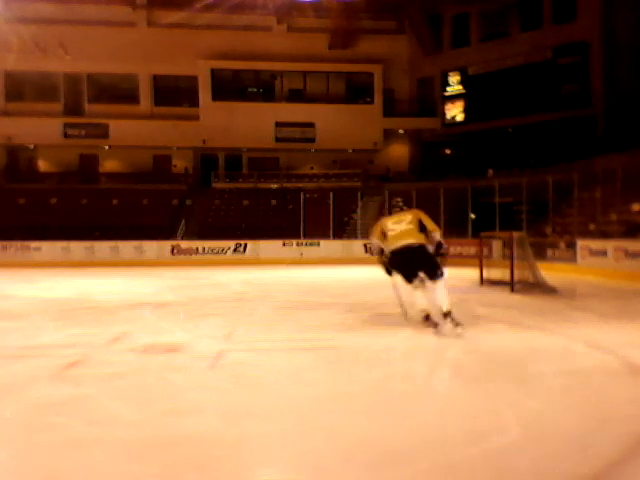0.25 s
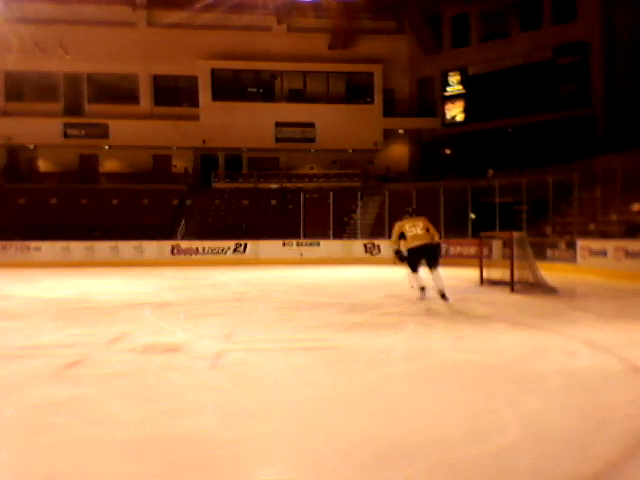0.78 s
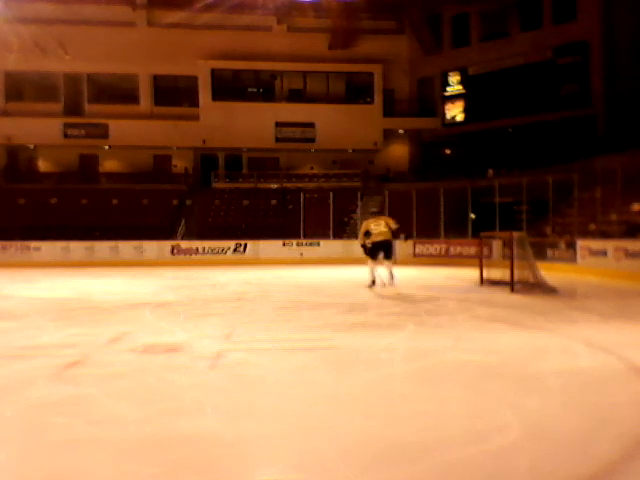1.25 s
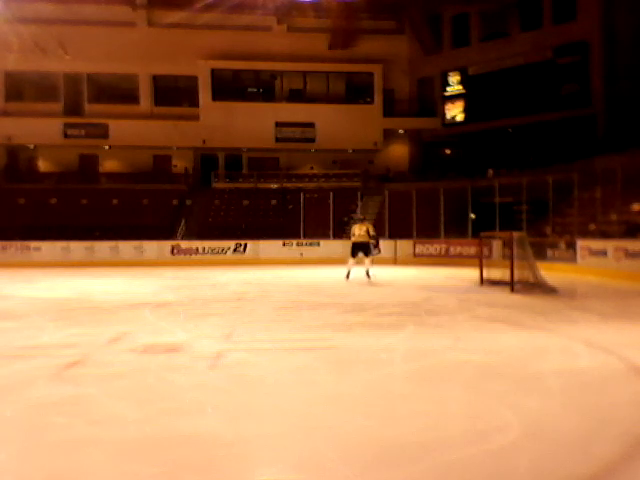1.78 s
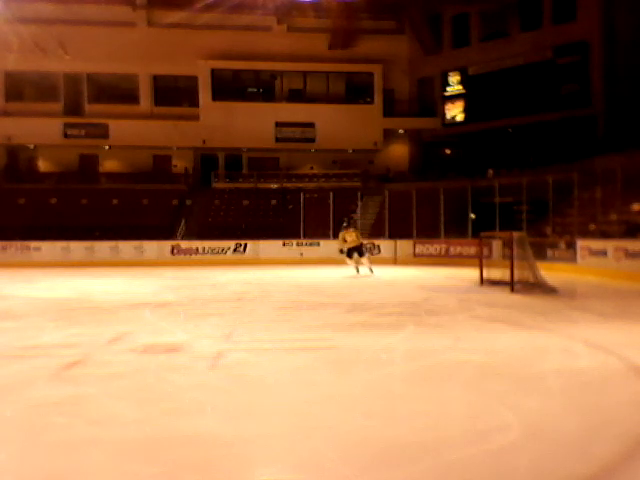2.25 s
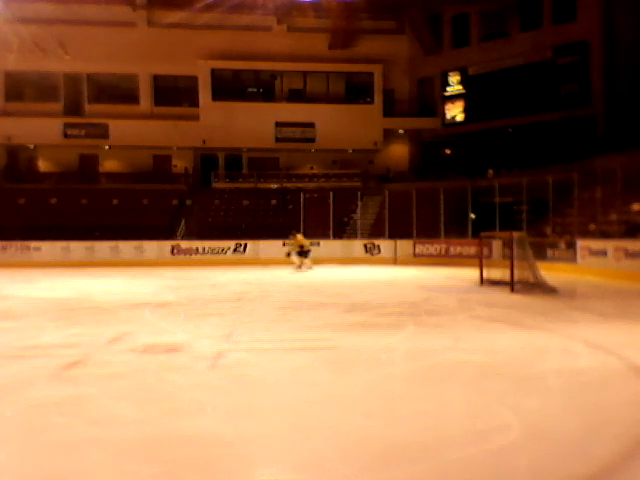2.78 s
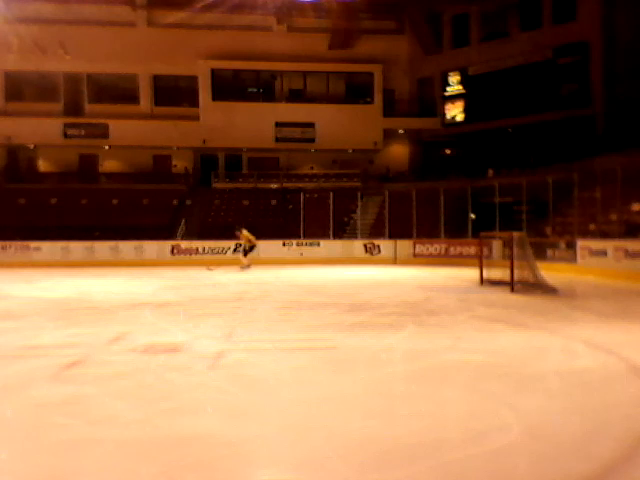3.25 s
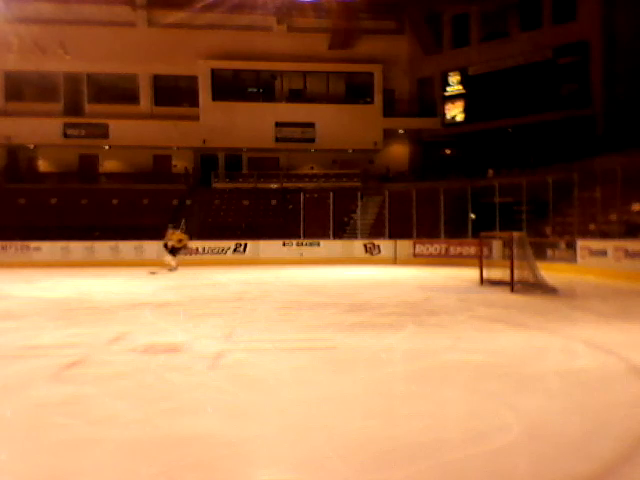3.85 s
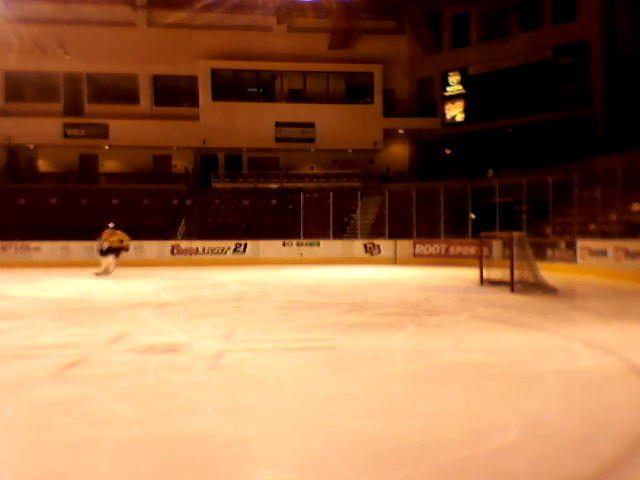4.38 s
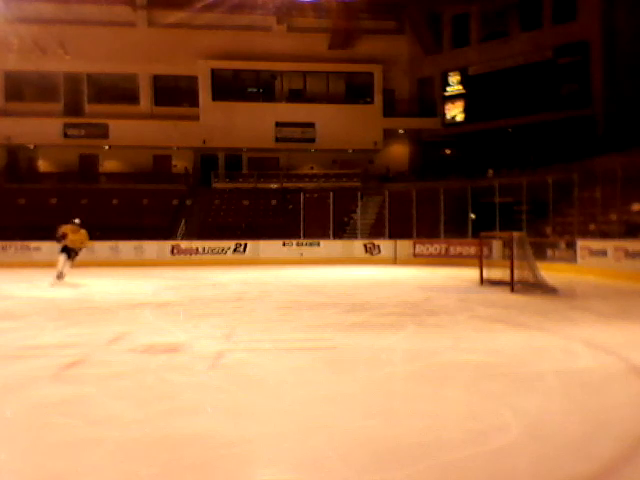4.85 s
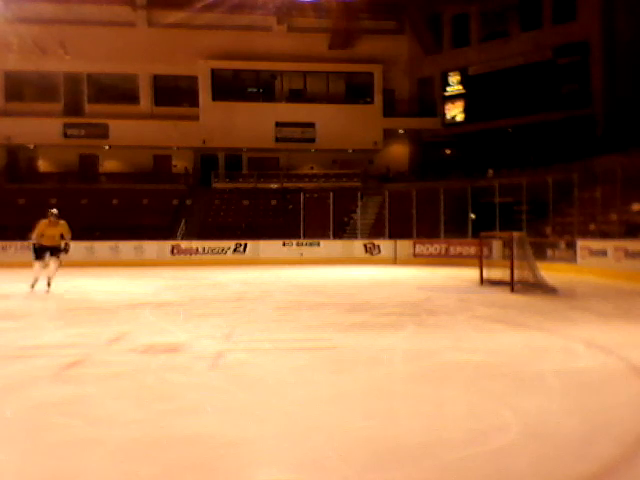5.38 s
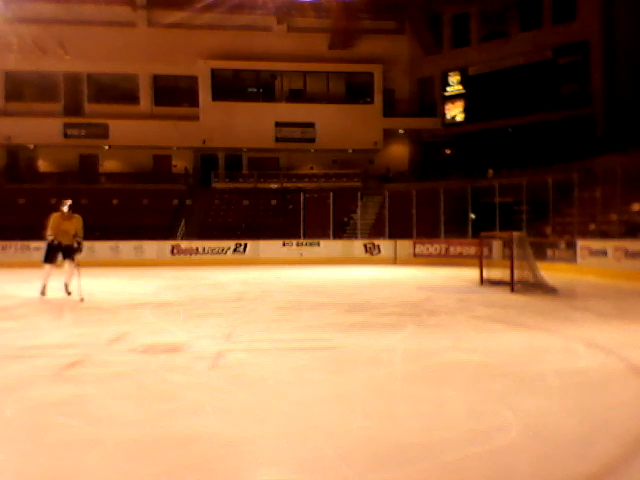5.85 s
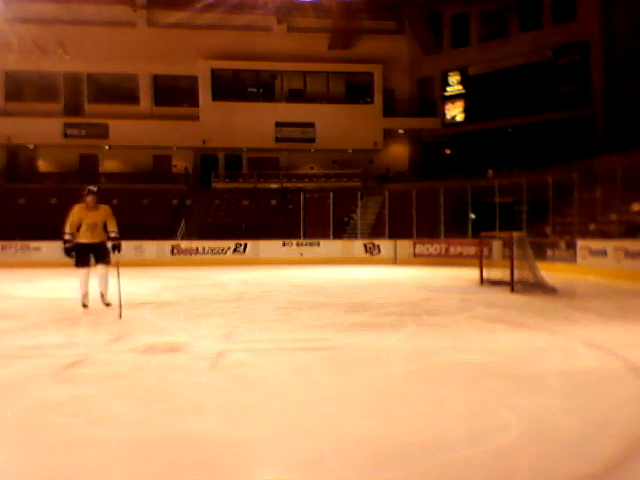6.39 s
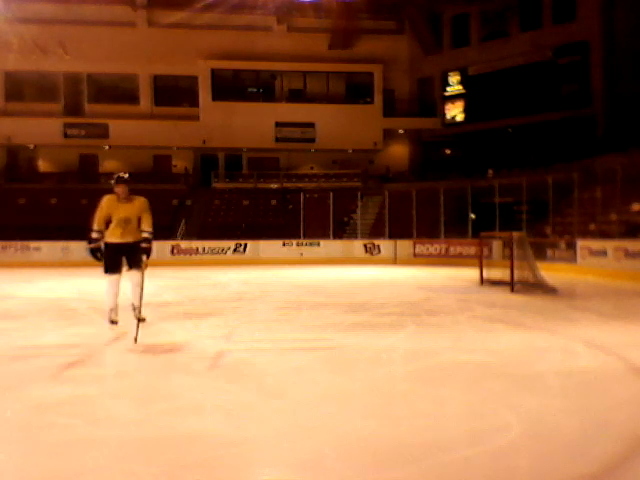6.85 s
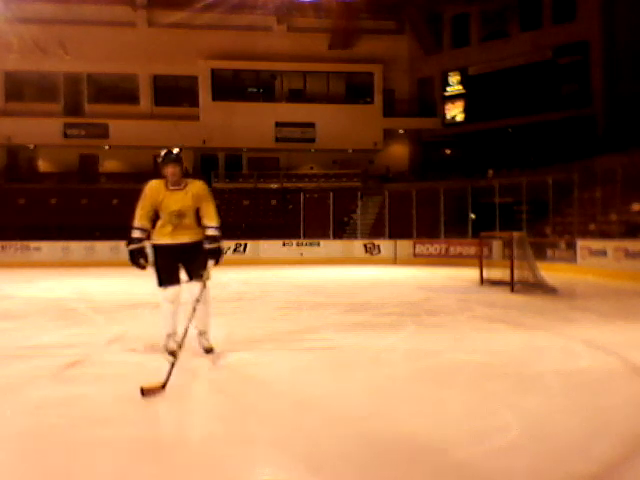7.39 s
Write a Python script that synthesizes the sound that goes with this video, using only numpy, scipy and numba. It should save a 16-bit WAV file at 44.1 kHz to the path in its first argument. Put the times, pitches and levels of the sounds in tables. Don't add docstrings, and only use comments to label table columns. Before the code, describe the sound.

Steel blades crunch and rasp over ice in quick strides, with dense crackles and clicks. The scraping thins, then surges into a harsh carved turn, chattering and throwing snow. It fades through lighter strokes to a faint glide, leaving a clear wooden stick tap and a softer one before a last small scrape. The empty hall adds reverberation over constant fan roar and low hum, captured on a limited, slightly overloaded small microphone.

```python
import sys
import numpy as np
from scipy import signal
from scipy.fft import rfft, irfft
from scipy.io import wavfile
from scipy.ndimage import uniform_filter1d
from numba import njit

SR = 44100
rng = np.random.default_rng(int(sys.argv[2]) if len(sys.argv) > 2 else 0)


def field_ratio(decibels):
    return 10 ** (np.asarray(decibels, dtype=float) / 20)


def digitize_waveform(pressure):
    field = np.atleast_2d(pressure).T
    bounded = np.clip(field, -1, 1)
    quanta = np.round(bounded * 32767).astype(np.int16)
    wavfile.write(sys.argv[1], SR, quanta)


N = 336702

# frequency in Hz, level in dB per Hz.
FAN_ROAR = [(15, -42.5), (25, -21.5), (53, 3.5), (157, 8), (341, 8), (462, 4.5), (1130, 16), (1570, 11),
            (2290, 5), (2760, 7), (4860, -18.5), (6300, 0), (6920, -44), (9000, -40.5), (15200, -120)]
# frequency in Hz, width in Hz, level in dB.
MOTOR_HUMS = [
    (72, 8.5, -59.5),
    (119.5, 22, -54),
]

# low edge in Hz, high edge in Hz, cracks a second, size scatter in dB.
CRACK_SIZES = [
    (224, 626, 2400, 1),
    (572, 1310, 3000, -1),
    (1300, 2576, 5000, 0.5),
    (2433, 4730, 4900, 0.5),
    (4050, 6350, 14000, 1.5),
]
# time in seconds, load in dB, body weight in dB, sideways skid in dB.
EDGE = [(0, -27, 6, -8.5), (.4, -27.5, 2, -9), (.95, -27, 4, -5), (1.35, -26.5, -1, -10),
        (1.95, -32, -1, -5), (2.3, -28, -3.5, 0), (2.5, -20.5, -6.5, -0.5), (2.7, -22.5, -8, -3),
        (2.9, -19, -5.5, -3.5), (3.2, -22, -10, -7.5), (3.5, -22, -7.5, -7.5), (3.7, -28.5, -4.5, -15.5),
        (4.0, -31.5, -3.5, -10), (4.9, -34.5, -2, -10.5), (5.4, -38, 0, -6), (5.95, -42, 2, 2),
        (6.8, -36, -2, -2), (7.63, -37, -1.5, -1)]
# start in seconds, hold in seconds, level in dB,
# grain in octaves above 1 kHz.
STROKES = [(0, 0.19, -21.5, 0.16), (0.144, 0.023, -18, 0), (0.2, 0.12, -25.5, -1), (0.474, 0.1, -34, 3),
           (0.59, 0.13, -28, 5), (0.657, 0.024, -31, 3), (0.766, 0.015, -17, -1),
           (0.926, 0.044, -20.5, -1.4), (0.985, 0.053, -31, 3.5), (1.005, 0.031, -24, 0.7),
           (1.482, 0.12, -29.5, 3.5), (2.112, 0.056, -25, -0.3), (2.4, 0.064, -22, 0.6),
           (2.835, 0.08, -16, 0.24), (2.96, 0.062, -19, 0.5), (2.701, 0.086, -25, 2.9),
           (2.872, .04, -20.5, 0.5), (3.194, 0.12, -17.5, 0.23), (3.533, 0.054, -22, 0),
           (3.73, 0.15, -27.5, 0), (4.086, 0.13, -25, 0.38), (4.51, 0.031, -24.5, 1),
           (4.591, 0.059, -24, 0.5), (4.675, 0.19, -30, 0.5), (5.01, 0.056, -28, -0.5),
           (5.088, 0.039, -30, -0.4), (5.177, 0.04, -35.5, 2.5), (5.417, 0.17, -36, 0),
           (6.05, 0.26, -39, 2.5), (6.27, 0.067, -31.5, 0.5), (6.433, 0.027, -37, -1.3),
           (7.42, 0.036, -39, 2.5), (7.481, 0.15, -35.5, 2)]
# start in seconds, hold in seconds, level in dB,
# grain in octaves above 1 kHz.
SNOW_PUFFS = [(0.124, 0.058, -34, 2.4), (0.341, 0.036, -32, 2.86), (0.682, 0.056, -30, 1.4),
              (0.907, 0.073, -22, 0.5), (1.095, 0.069, -27.5, 1.06), (2.545, 0.18, -21.5, 1.6),
              (2.745, 0.072, -20.5, 1.1), (2.88, 0.024, -19, 3.2), (3.41, 0.14, -24.5, 1.05),
              (4.139, .05, -35.5, 2.8), (4.276, 0.06, -38, 1.3), (5.015, 0.075, -29, 3.27),
              (5.967, 0.054, -50, 2.9), (6.663, 0.098, -38, 1.9), (6.811, 0.23, -37, 1.6),
              (7.333, 0.04, -41, 2.4), (2.085, 0.11, -29, 1.53), (1.017, 0.028, -31.5, 2.8),
              (6.44, 0.22, -36, 3.5), (7.557, 0.064, -32, 0.68)]
# start in seconds, hold in seconds,
# comb spacing in Hz, strength from 0 to 1.
SLIDES = [
    (.13, .05, 1500, .3),
    (.5, .08, 1750, .55),
    (2.1, .1, 1550, .4),
    (2.45, .1, 1700, .45),
    (2.57, .05, 1750, .35),
    (4.14, .09, 1680, .7),
    (5.0, .15, 1600, .5),
    (7.47, .07, 1920, .45),
    (7.57, .06, 1860, .35),
]

# time in seconds, ring level in dB, ring pitch in Hz, crack level in dB,
# length in ms. Crunches and stick taps below have the same columns.
STRIDE_KNOCKS = [(0.053, -13.5, 840, -24.5, 1.6), (0.458, -10.5, 944, -37, 1.8),
                 (0.478, -15.5, 818, -26, 6), (0.548, -12, 1680, -27, 3.5),
                 (0.6263, -11.5, 1095, -13.5, 4.5), (0.732, -8.5, 1190, -13, 4.5),
                 (0.748, -10.5, 2330, -16, 1.6), (0.76, -13, 1524, -13.5, 5.8), (0.767, -14, 590, -26, 4.3),
                 (0.839, -26.5, 1950, -19, 2.6), (0.877, -19.5, 1710, -22.5, 10),
                 (0.883, -13, 1666, -14.5, 4.2), (0.944, -20.5, 1616, -21.5, 3.2),
                 (0.961, -17.5, 1490, -15.5, 2.6), (1.029, -23.5, 1680, -21, 3.5),
                 (1.054, -23, 1290, -17, 1.6), (1.189, -11.5, 1895, -30.5, 2.6),
                 (1.283, -14.5, 890, -34, 18), (1.999, -21, 1095, -20.5, 5.8),
                 (2.021, -19, 2090, -22.5, 6.7), (2.035, -23, 1820, -20, 5.7)]
TURN_KNOCKS = [(2.583, -15.5, 1160, -17.5, 2.7), (2.735, -14.5, 833, -16, 4),
               (2.753, -14.5, 1725, -17.5, 2.4), (2.82, -10, 707, -25.5, 3.2),
               (2.861, -13.5, 974, -18.5, 6.1), (2.888, -14, 1646, -20, 5.4), (2.895, -10, 1570, -6.5, 1.6),
               (2.909, -4, 848, -16, 2.5), (2.994, -11, 793, -18, 4.8), (3.049, -10, 987, -22, 2.5),
               (3.2943, -13.5, 1067, -10.5, 4.5), (3.384, -10.5, 1004, -9.5, 4.4),
               (3.4504, -10.5, 1104, -12, 3.1), (3.465, -12.5, 2264, -14.5, 4.9),
               (3.571, -16, 2430, -34, 0.7), (3.677, -15.5, 2170, -42, 3.1)]
RETURN_KNOCKS = [(4.101, -17.5, 1150, -31, 2.6), (4.2535, -27.5, 1370, -15, 7.1),
                 (4.366, -16, 1035, -20.5, 6.8), (4.379, -18, 1150, -16.5, 12),
                 (4.398, -20, 1000, -21, 2.7), (4.4925, -9.5, 1000, -28, 3.1),
                 (4.519, -19, 1130, -28.5, 8.8), (4.551, -16, 1150, -31.5, 3.4),
                 (4.618, -22, 1300, -31, 4.7), (4.645, -19.5, 1130, -25, 3.4), (4.739, -21, 1820, -35, 4.5),
                 (5.04, -26, 1710, -33.5, 3.4), (5.383, -20.5, 820, -31.5, 4.6),
                 (5.457, -18.5, 926, -27, 6), (6.18, -26, 590, -17.5, 4.2), (6.288, -15.5, 950, -29.5, 2.6),
                 (7.581, -20.5, 1390, -28.5, 10)]
CRUNCHES = [
    (.14, -23.5, 1590, -30, 41),
    (4.2, -22, 1620, -26, 21),
    (5.024, -21, 1300, -34, 21),
    (5.092, -22, 1620, -35.5, 45),
    (6.283, -38, 916, -36.5, 18),
]
STICK_TAPS = [
    (1.4505, -10, 1200, -14.5, 4),
    (6.309, -21.5, 1065, -23, 2.8),
    (6.7636, -9, 923, -18.5, 1.6),
    (6.8995, -17, 994, -18.5, 3.1),
]

# time in seconds, level in dB, pitch in Hz, length in ms.
STRIDE_CHIPS = [(.087, -15, 910, 2.7), (.12, -12.5, 996, 2.5), (.145, -14, 1770, 4.4),
                (.155, -14.5, 2310, 6.6), (.163, -15.5, 1790, 4.4), (.171, -17.5, 1506, 3.7),
                (.195, -24.5, 4950, 4), (.481, -23, 2600, 3.4), (.506, -15.5, 1780, 3.4),
                (.525, -15, 1740, 6.4), (.572, -15, 1720, 8.1), (.626, -16, 3160, 5.5),
                (.628, -20, 5530, 2.8), (.669, -22.5, 4450, 5.7), (.695, -21, 4880, 3.4),
                (.732, -13.5, 2880, 4), (.762, -13.5, 2700, 4), (.734, -23.5, 6000, 4),
                (.764, -20.5, 3680, 4), (.885, -24.5, 4690, 5), (.053, -20, 2370, 3), (.167, -26, 4856, 8),
                (1.037, -18.5, 1790, 5), (.93, -14.5, 1097, 3), (.936, -17, 2000, 3), (.968, -15, 800, 3),
                (.149, -14, 1100, 3), (.159, -14, 1402, 3), (.886, -16, 490, 9.1), (.908, -21, 1614, 7.9),
                (.921, -17, 426, 3.2), (.933, -23, 420, 5), (.944, -13, 2730, 3.6), (.976, -11, 998, 6),
                (1.007, -19.5, 390, 6.9), (1.033, -18, 1844, 8), (1.075, -18.5, 1540, 5),
                (.839, -22, 3110, 4), (.884, -19, 3270, 5), (.961, -23, 3720, 4), (1.022, -18, 3220, 4.6),
                (1.029, -23, 5830, 5), (1.052, -26.5, 5530, 5), (1.495, -28.5, 5070, 6.1),
                (1.4525, -23.5, 3100, 2.1), (1.305, -19, 894, 5.8), (1.451, -19, 2155, 4.5)]
LATER_CHIPS = [(2.475, -16, 1670, 15), (2.51, -15, 1720, 6), (2.549, -14, 1710, 6.6),
               (2.595, -19.5, 1780, 7.4), (2.948, -10, 900, 3), (3.4505, -13, 2170, 3),
               (3.2945, -10.5, 3660, 2.7), (3.3847, -11, 3270, 4.2), (2.628, -13.5, 1800, 1.7),
               (2.698, -17, 988, 2.5), (2.734, -16.5, 1677, 4), (3.415, -15, 994, 9.5),
               (4.249, -24, 1300, 2.8), (4.255, -21.5, 3500, 4.5), (4.371, -16.5, 1020, 3),
               (4.961, -33.5, 4050, 2.5), (4.97, -22, 937, 12), (5.386, -26, 900, 6.7),
               (5.474, -24.5, 980, 6.6), (6.18, -20, 2830, 3.6), (6.299, -22.5, 1000, 4.4),
               (6.336, -26, 1200, 3.2), (6.445, -26.5, 740, 6.6), (6.7641, -23, 4200, 1.7),
               (7.549, -25.5, 1380, 14), (4.366, -20, 3930, 3.8), (4.378, -25, 5480, 2.9),
               (4.39, -26.5, 3040, 11), (4.497, -11.5, 1007, 2), (4.525, -25.5, 2710, 6.2),
               (4.575, -17, 800, 6.8), (4.607, -16.5, 890, 4.6), (4.645, -21, 2140, 4.3),
               (4.905, -26, 834, 4.8), (7.314, -31, 1770, 3.6), (7.467, -24.5, 1380, 6.6),
               (7.479, -21.5, 2000, 4.8), (7.51, -29, 1610, 5.5), (7.582, -23, 3580, 7.3),
               (7.605, -28, 1390, 8)]
MORE_CHIPS = [(4.496, -24, 2750, 4), (4.458, -26, 1800, 5), (4.667, -33, 5100, 5), (6.181, -30, 5000, 3),
              (6.311, -26, 2900, 3), (3.049, -22, 4300, 3), (4.493, -26, 339, 5), (4.492, -20, 1900, 4),
              (6.18, -26, 380, 6.2), (6.1802, -21.5, 1400, 4), (6.764, -20, 522, 3.7),
              (6.764, -14.5, 1890, 2), (1.999, -21.5, 5170, 4), (2.025, -22, 1400, 13),
              (0.732, -13.5, 1910, 4), (.627, -13.5, 1890, 3.4), (2.888, -11, 996, 10),
              (1.555, -28.5, 5030, 5.4), (6.18, -25, 3400, 3), (.458, -17, 1900, 2),
              (3.4505, -16, 3200, 2.5)]
# start in seconds, hold in seconds, level in dB,
# pitch in Hz, width as a share of the pitch.
CHATTERS = [(.14, .035, -22, 1700, .3), (.03, .05, -25, 620, .25), (.49, .09, -26, 1500, .3),
            (.9, .08, -25, 1550, .15), (.93, .05, -27, 2700, .2), (2.53, .07, -29, 3600, .1),
            (2.6, .23, -25, 3000, .14), (2.52, .2, -30, 4750, .08), (2.875, .02, -27, 6300, .07),
            (2.2, .2, -29, 1100, .15), (2.84, .08, -24, 950, .15), (2.84, .08, -24, 1900, .1),
            (2.97, .07, -25, 900, .15), (4.51, .12, -27, 1000, .18), (4.53, .1, -31, 1700, .1),
            (4.7, .09, -29, 1050, .18), (7.45, .17, -37, 3650, .07), (7.46, .15, -36, 1900, .07),
            (2.55, .2, -30, 3700, .12), (7.55, .07, -33, 1350, .12), (7.39, .04, -37, 1100, .15),
            (6.33, .03, -34, 1100, .15), (3.0, .2, -29, 2700, .2), (3.4, .2, -31, 3000, .2),
            (7.25, .04, -36, 1100, .15)]

# start in seconds, hold in seconds.
NARROWED = [(.32, .09), (.64, .07), (.77, .075), (1.205, .03), (1.4, .03), (2.24, .02), (2.81, .02),
            (2.985, .24), (3.59, .02), (3.71, .02), (6.155, .02), (6.21, .035), (6.91, .07)]
# start in seconds, hold in seconds, low edge in Hz,
# high edge in Hz, share dropped from 0 to 1.
STARVED = [
    (4.45, .075, 3000, 6800, .45),
    (6.12, .05, 3000, 4400, .4),
    (6.19, .055, 2900, 4200, .5),
    (6.74, .08, 3200, 5500, .2),
    (3.06, .17, 4000, 6600, .25),
    (.69, .05, 4800, 6800, .2),
    (0, .08, 6200, 6900, .4),
    (7.3, .14, 5000, 6800, .1),
]

FANS_DB = -35
HALL_T60_S, HALL_DAMP = 1.75, 0.47
KNOCK_WET_DB, CARVE_WET_DB = -15.5, -17.5
STRIDE_CRACK_HZ, TURN_CRACK_HZ, RETURN_CRACK_HZ, STICK_CRACK_HZ = 2380, 3286, 2430, 1800
CHIP_WIDTH, CHIP_RING = .24, .6
CHATTER_RATE, CHATTER_DB = 70, 4
LARGEST_CRACK, FLICKER_DB = 2.6, .6
GROOVE_DB, GROOVE_PER_WEIGHT = 1.5, 0.25
SNOW_DB, POWDER_DB, POWDER_PER_SKID = -1.5, -5, 1.65
GRAIN_OCTAVES = 0.53
RISE_S, FALL_S, EASE = 0.035, 0.017, .1
MIRROR_REST = .22
SING_DB, SING_WIDTH = 2, .06
OVERTONE, OVERTONE_DB = 1.93, -1
MIC_LOW_HZ, RUMBLE_HZ, CUT_HZ, NARROW_HZ = 172, 42, 6880, 6510
PREAMP_CEILING, CEILING = .75, .72
FRAME, LINES_KEPT, BAND_LINES, COARSE_FROM = 1152, 402, 6, 155
STEP_PER_RMS, CALM_CREST = 2.1, 4.2


def level(x, db):
    return x * field_ratio(db) / np.sqrt(np.mean(x ** 2))


def burst(x, db):
    return x * field_ratio(db) / np.sqrt(np.max(uniform_filter1d(x ** 2, size=110)))


def band(x, lo_hz, hi_hz):
    return signal.sosfilt(signal.butter(2, [lo_hz, hi_hz], "band", fs=SR, output="sos"), x)


def walk(rate):
    k = int(SR / rate)
    held = np.repeat(rng.standard_normal(N // 200), k)[:N]
    return 0.87 * uniform_filter1d(uniform_filter1d(held, k), k)


def curves(table):
    s, *columns = np.transpose(table)
    return [np.interp(np.arange(N) / SR, s, c) for c in columns]


def swell(start_s, hold_s):
    rise_s, fall_s = RISE_S + EASE * hold_s, FALL_S + EASE * hold_s
    corners = start_s + np.cumsum([-rise_s, rise_s, hold_s, fall_s])
    return np.interp(np.arange(N) / SR, corners, [0, 1, 1, 0])


def around(start_s, hold_s):
    return slice(max(int((start_s - .15) * SR), 0), int((start_s + hold_s + .2) * SR))


def fans():
    f = np.maximum(np.arange(N // 2 + 1) * SR / N, 1)
    hz, db = np.transpose(FAN_ROAR)
    shape = field_ratio(np.interp(np.log(f), np.log(hz), db))
    roar = irfft(rfft(rng.standard_normal(N)) * shape, N)
    hums = sum(level(band(rng.standard_normal(N), c - w / 2, c + w / 2), d) for c, w, d in MOTOR_HUMS)
    return level(roar, FANS_DB) * field_ratio(0.19 * walk(8.9)) + hums


@njit
def hall(x, lags, gain, damp):
    line, soft, out = np.zeros((8, 8192)), np.zeros(8), np.zeros(len(x))
    for i in range(len(x)):
        total = 0.
        for k in range(8):
            soft[k] += (1 - damp) * (gain[k] * line[k, (i - lags[k]) & 8191] - soft[k])
            total += soft[k]
        out[i] = soft[0] - soft[3] + soft[5] - soft[6]
        for k in range(8):
            line[k, i & 8191] = x[i] + soft[k] - total / 4
    return out


def knocks():
    out, t = np.zeros(N + 2048), np.arange(2048) / SR
    groups = [(STRIDE_KNOCKS, STRIDE_CRACK_HZ), (TURN_KNOCKS, TURN_CRACK_HZ),
              (RETURN_KNOCKS + CRUNCHES, RETURN_CRACK_HZ), (STICK_TAPS, STICK_CRACK_HZ)]
    events = [(*row, hz) for rows, hz in groups for row in rows]
    noise = rng.standard_normal((len(events), len(t)))
    strike = 1 - np.exp(-t / .0003)
    for (s, ring_db, ring_hz, crack_db, ms, crack_hz), chip in zip(events, noise):
        fade = strike * np.exp(-(1000 * t / ms) ** 1.25)
        ring = -np.sin(2 * np.pi * ring_hz * t) - 0.13 * np.sin(2 * np.pi * 2.15 * ring_hz * t)
        grind = level(band(chip, 660, 1650), -4.0) + level(band(chip, ring_hz / 1.25, ring_hz * 1.205), -0.66)
        body = ring + ms / 6 * grind
        broad = band(band(chip, crack_hz / 4, crack_hz * 2), crack_hz / 3, crack_hz * 1.7)
        peak = band(chip, crack_hz / 1.3, crack_hz * 1.25)
        splinter = level(broad, 0) + level(peak, -5)
        i = int(s * SR)
        out[i:i + len(t)] += burst(fade * body, ring_db) + burst(fade * splinter, crack_db)
    return out[:N]


def chips():
    out, t = np.zeros(N + 2048), np.arange(2048) / SR
    events = STRIDE_CHIPS + LATER_CHIPS + MORE_CHIPS
    noise = rng.standard_normal((len(events), len(t)))
    for (s, db, hz, ms), grit in zip(events, noise):
        fade = (1 - np.exp(-t / .0005)) * np.exp(-(1000 * t / ms) ** 1.5)
        rough = level(band(grit, hz / (1 + CHIP_WIDTH), hz * (1 + CHIP_WIDTH)), -6.5)
        tone = CHIP_RING * np.sin(2 * np.pi * hz * t) + rough
        i = int(s * SR)
        out[i:i + len(t)] += burst(fade * tone, db)
    return out[:N]


def chatters():
    rasp = rng.standard_normal(N) * field_ratio(CHATTER_DB * walk(CHATTER_RATE))
    out = np.zeros(N)
    for s, hold_s, db, hz, width in CHATTERS:
        span = around(s, hold_s)
        narrow = band(rasp[span], hz / (1 + width), hz * (1 + width))
        out[span] += swell(s, hold_s)[span] * level(narrow, db)
    return out


def layer_gains():
    load, weight, skid = curves(EDGE)
    glide_db = [load + weight, load + GROOVE_DB + GROOVE_PER_WEIGHT * weight, load,
                load + SNOW_DB + skid, load + POWDER_DB + POWDER_PER_SKID * skid]
    power = field_ratio(2 * np.array(glide_db))
    octaves = np.array([np.log2(np.sqrt(lo * hi) / 1000) for lo, hi, *_ in CRACK_SIZES])
    for s, hold_s, db, grain in STROKES + SNOW_PUFFS:
        share = np.exp(-((octaves - grain) / GRAIN_OCTAVES) ** 2)
        span = around(s, hold_s)
        power[:, span] += np.outer(share, field_ratio(2 * db) * swell(s, hold_s)[span] ** 2)
    return np.sqrt(power)


def ice_mirror():
    s, hold_s, comb_hz, _ = np.transpose(SLIDES)
    strength = MIRROR_REST + sum((top - MIRROR_REST) * swell(a, b) for a, b, _, top in SLIDES)
    return np.interp(np.arange(N) / SR, s + hold_s / 2, comb_hz), strength


def singing_steel(rasp, multiple, db):
    out = np.zeros(N)
    for s, hold_s, comb_hz, top in SLIDES:
        hz = multiple * comb_hz
        out += top * swell(s, hold_s) * level(band(rasp, hz * (1 - SING_WIDTH), hz * (1 + SING_WIDTH)), db)
    return out


def blades():
    gains = layer_gains()
    comb_hz, mirror = ice_mirror()
    judder = walk(30)
    layers = []
    for gain, (lo, hi, rate, scatter_db) in zip(gains, CRACK_SIZES):
        happens = rng.random(N) < rate / SR
        size = rng.standard_normal(N) * field_ratio(scatter_db * rng.standard_normal(N))
        cracks = happens * np.clip(size, -LARGEST_CRACK, LARGEST_CRACK)
        flicker = field_ratio(FLICKER_DB * (judder + walk(18)))
        layers.append(gain * level(band(cracks, lo, hi), 0) * flicker)
    bright = sum(layers[2:])
    echo = np.interp(np.arange(N) + 2 - SR / comb_hz, np.arange(N), bright)
    echo = signal.lfilter(*signal.butter(1, 2500, fs=SR), echo)
    mirrored = (bright + mirror * echo) / np.sqrt(1 + mirror ** 2)
    rasp = rng.standard_normal(N)
    sing = singing_steel(rasp, 1, SING_DB)
    overtone = singing_steel(rasp, OVERTONE, OVERTONE_DB)
    return sum(layers[:2]) + gains[2] * sing + gains[3] * overtone + mirrored


def scene():
    low_cut = signal.butter(3, MIC_LOW_HZ, "high", fs=SR, output="sos")
    carve = signal.sosfilt(low_cut, blades() + chatters())
    ticks = signal.sosfilt(low_cut, knocks() + chips())
    lags = np.array([1153, 1613, 2111, 2699, 3301, 3907, 4603, 5407])
    feed = field_ratio(CARVE_WET_DB) * carve + field_ratio(KNOCK_WET_DB) * ticks + 1e-18
    wet = hall(feed, lags, field_ratio(-60 * lags / SR / HALL_T60_S), HALL_DAMP)
    return (carve + ticks + wet + fans())[None]


def coarse_frames(x):
    n, k = np.arange(2 * FRAME)[:, None] + .5, np.arange(LINES_KEPT) + .5
    window = np.sin(np.pi * n / 2 / FRAME)
    basis = window * np.cos(np.pi / FRAME * (n + FRAME / 2) * k) * np.sqrt(2 / FRAME)
    count = N // FRAME + 2
    blocks = np.pad(x, (FRAME, (count + 1) * FRAME - N - FRAME)).reshape(-1, FRAME)
    pairs = np.hstack([blocks[:-1], blocks[1:]])
    lines = pairs @ basis
    calm = np.abs(pairs).max(axis=1) < CALM_CREST * pairs.std(axis=1)
    step = STEP_PER_RMS * np.sqrt(uniform_filter1d(lines ** 2, size=31, axis=1) + 1e-16)
    lines[calm, COARSE_FROM:] = (step * np.round(lines / step))[calm, COARSE_FROM:]
    t = np.arange(count)[:, None] * FRAME / SR
    hz = (np.arange(LINES_KEPT // BAND_LINES) + .5) * BAND_LINES * SR / 2 / FRAME
    share = sum(p * (t > s) * (t < s + hold_s) * (hz > lo) * (hz < hi) for s, hold_s, lo, hi, p in STARVED)
    kept = np.repeat(rng.random(share.shape) > share, BAND_LINES, axis=1)
    frames = (lines * kept) @ basis.T
    return (frames[:-1, FRAME:] + frames[1:, :FRAME]).ravel()[:N]


def band_limit(x):
    return signal.sosfilt(signal.butter(12, 15830, fs=SR, output="sos"), x)


def record(dry):
    rumble_cut = signal.butter(2, RUMBLE_HZ, "high", fs=SR, output="sos")
    loaded = signal.sosfilt(rumble_cut, np.clip(dry, -PREAMP_CEILING, PREAMP_CEILING))
    wide, narrow = (signal.sosfiltfilt(signal.ellip(10, .15, 60, hz, fs=SR, output="sos"), loaded)
                    for hz in (CUT_HZ, NARROW_HZ))
    t = np.arange(N) / SR
    busy = uniform_filter1d(sum(1. * (t > s) * (t < s + hold_s) for s, hold_s in NARROWED), size=600)
    stored = coarse_frames((wide + busy * (narrow - wide))[0])[None]
    return band_limit(np.clip(stored, -CEILING, CEILING))


dry = scene()
out = record(dry)
digitize_waveform(out)
```